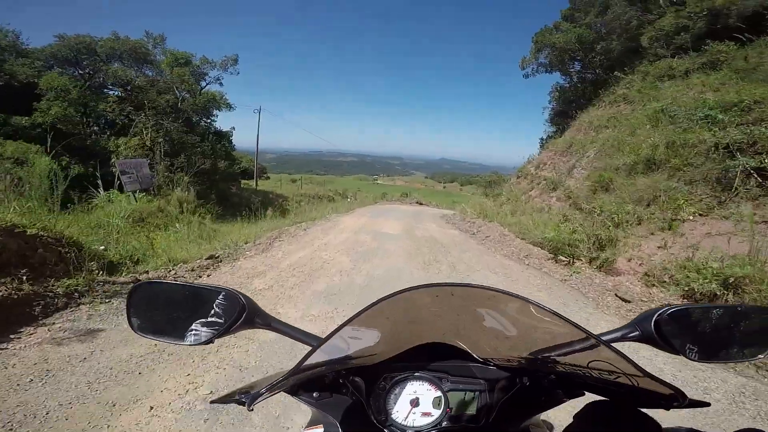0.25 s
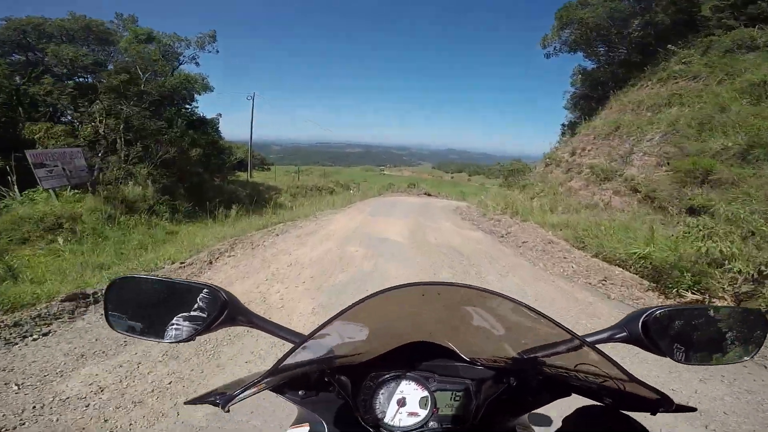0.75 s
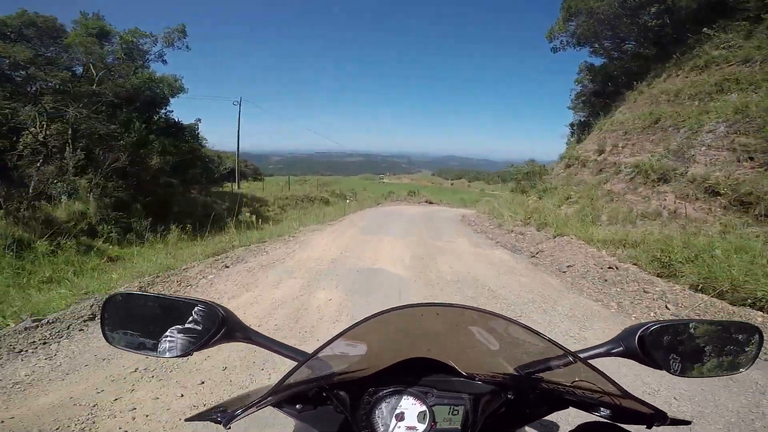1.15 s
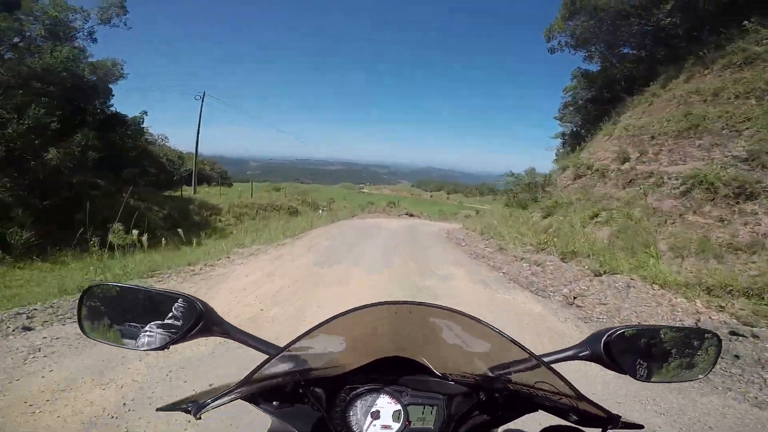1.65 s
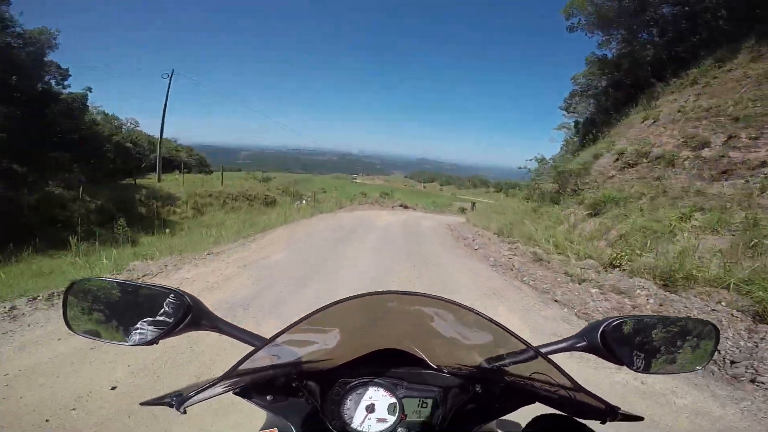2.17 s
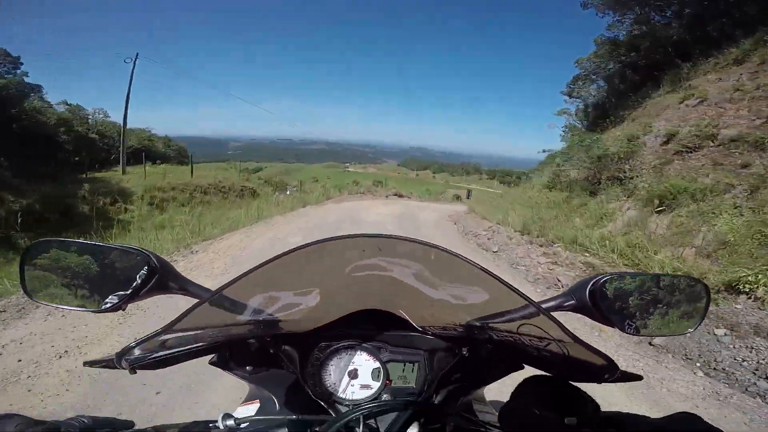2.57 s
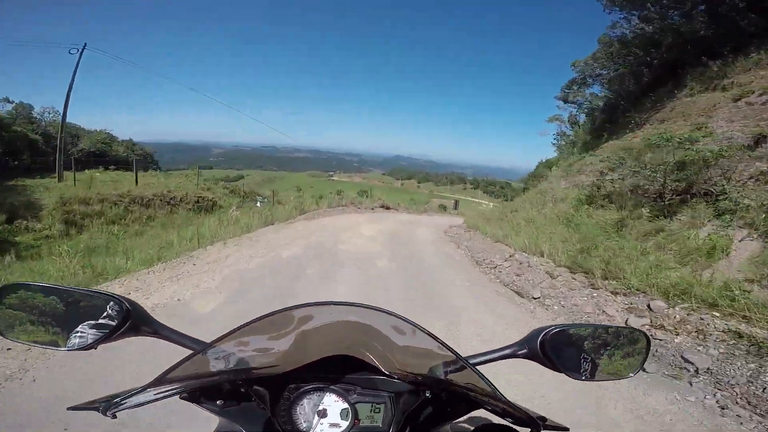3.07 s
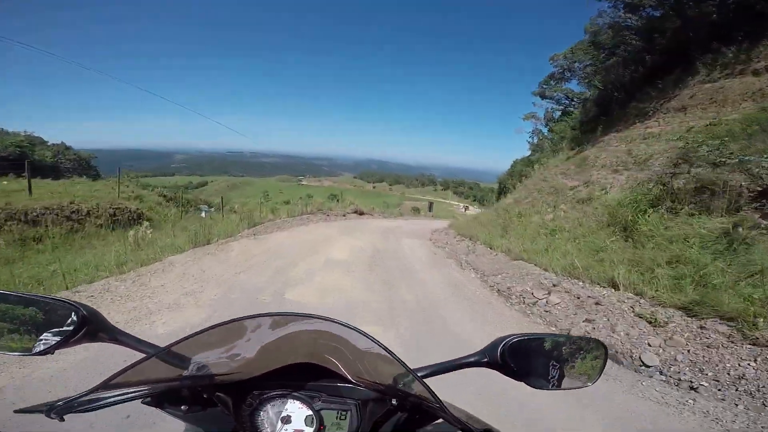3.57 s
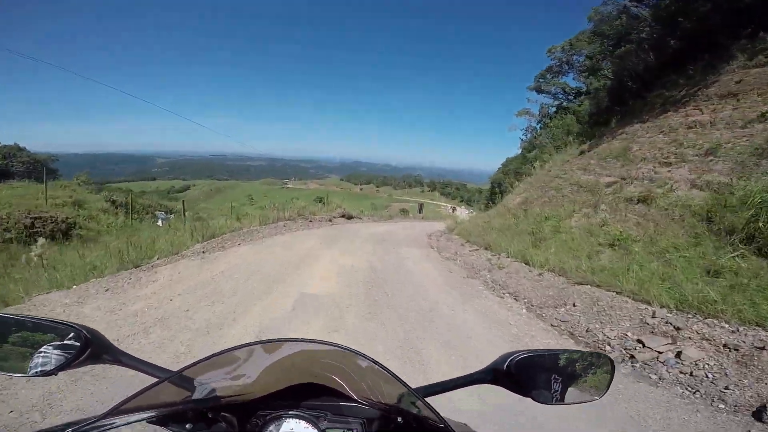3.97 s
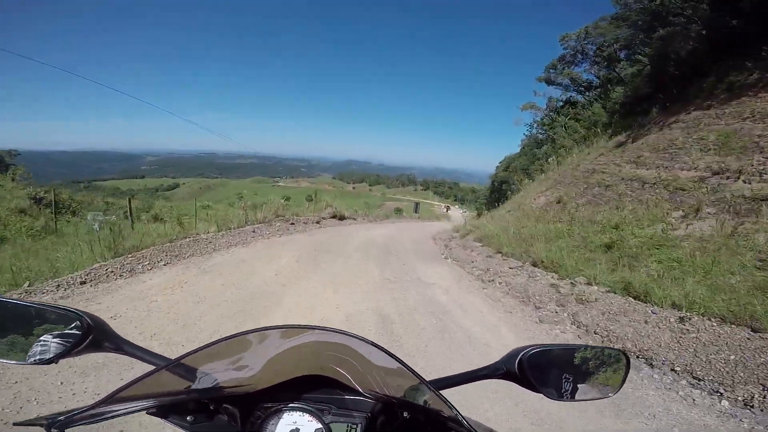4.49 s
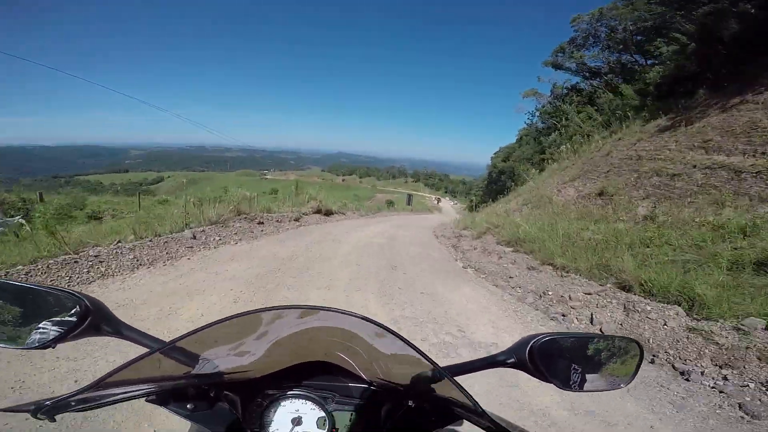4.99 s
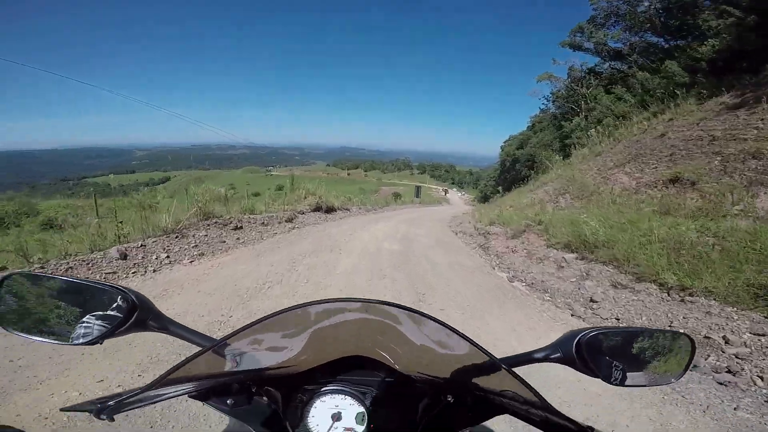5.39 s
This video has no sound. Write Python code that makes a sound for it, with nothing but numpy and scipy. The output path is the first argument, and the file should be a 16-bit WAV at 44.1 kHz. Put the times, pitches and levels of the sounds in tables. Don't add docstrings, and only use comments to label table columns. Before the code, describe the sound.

A four-cylinder motorcycle rolls slowly along an open gravel road, heard from an enclosed helmet camera just above it: close, dry, bass-heavy and muffled. The engine dominates throughout, a deep boom around 60 pulses per second, with double suction pulses, rough frame hum and irregular weak firings; it rises slightly near 3.9 s, then settles. Beneath lie tyre rumble, dull flickering gravel hiss, a faint chain whir, buzzing panels and windscreen, and a thin pump whine until about 3.6 s, returning at 5.45 s. Stones knock at 0.14 s; potholes thump at 0.2 s and 0.9-1.0 s, the boom briefly choking. A sharp tick comes at 0.48 s. Separate knocks follow at 0.94, 1.45 and 2.84 s, with thumps and knocks between 3.1 and 4.3 s. Stronger hits land at 4.47 s and, loudest, 4.98 s, before clustered rattling stones and grit scrapes around 5.4 s.

```python
import sys
import numpy as np
from scipy import signal
from scipy.fft import rfft, irfft
from scipy.io import wavfile
from scipy.ndimage import uniform_filter1d

SR = 44100
rng = np.random.default_rng(int(sys.argv[2]) if len(sys.argv) > 2 else 0)


def bounce(signal):
    frames = np.transpose(np.atleast_2d(signal))
    limited = np.clip(frames, -1, 1)
    pcm = np.round(limited * 32767).astype(np.int16)
    wavfile.write(sys.argv[1], SR, pcm)


def undo_db(level):
    steps = np.asarray(level, float) / 20
    return 10 ** steps


N = 248724
TIME, FREQ = np.arange(N) / SR, np.arange(N // 2 + 1) * SR / N + 1e-3

# (frequency [Hz], level [dB per Hz])
RUMBLE = [(12, -15.5), (30, -13), (60, 1.5), (100, -11), (250, -6), (450, -27.5), (700, -38), (1500, -97.5)]
# (frequency [Hz], level [dB per Hz])
HISS = [(280, -17.5), (450, -18), (620, -17), (760, -22.5), (1300, -25), (2200, -30),
        (3000, -28), (4200, -33.5), (5000, -47), (7000, -57), (10000, -63.5), (12500, -61), (14000, -54.5),
       (15000, -59.5)]
# (frequency [Hz], width [Hz], lift [dB])
COVERS = [(1330, 200, .5), (2250, 350, -1.5), (1900, 120, 2.5), (3300, 300, 1.5), (3750, 400, 2),
          (7500, 500, 3), (8570, 90, 4)]
# (time [s], length [s],
# level [dB], frequency [Hz], width [Hz])
SCRAPES = [(0.037, 0.079, -80, 14600, 5000), (0.146, 0.057, -41.5, 450, 700), (0.47, .04, -46.5, 705, 600),
           (4.5, 0.032, -46, 800, 1000), (0.474, 0.077, -47.5, 1210, 1600), (2.765, 0.075, -66, 4830, 4000),
           (2.915, 0.14, -81, 5204, 3020), (4.78, 0.027, -43, 1200, 1800), (4.845, 0.046, -46, 1088, 1830),
           (4.854, .07, -76, 7422, 900), (5.256, 0.01, -50, 3170, 249.4), (5.419, 0.042, -40.5, 1050, 1700),
           (5.475, .04, -50.5, 1190, 1800), (2.57, .09, -56, 2610, 200), (4.757, 0.054, -55, 2730, 220),
           (2.865, .04, -72, 5200, 3500), (3.04, .03, -69, 4900, 3000), (4.86, .07, -73, 5560, 3000),
           (5.12, .03, -79, 14200, 2500), (5.408, .04, -74.5, 5970, 4968),
           (5.415, 0.045, -70.5, 13250, 3980)]
# (time [s], frequency [Hz])
CHAIN = [(0, 2550), (2.0, 2560), (2.6, 2620), (3.5, 2700), (4.0, 2735), (5.0, 2725), (5.64, 2680)]
# (frequency [Hz], level [dB], width [Hz])
PANELS = [(1905, -67, 120), (3290, -69, 90), (3720, -68, 90), (14400, -95, 120)]
# (time [s], level [dB])
SCREEN = [(0, -55.5), (1.0, -61), (2.7, -63.5), (3.2, -59), (3.9, -57.5), (4.5, -74.5), (5.64, -75)]
# (start [s], stop [s])
PUMP_RUNS = [
    (0.051, 3.5),
    (5.45, 6.),
]
# (time [s], peak level [dB], pitch [Hz])
BUMPS = [(0.1743, -24, 75.6), (0.19, -28, 206), (0.668, -35, 42.7), (0.871, -22, 74), (0.871, -22.5, 216),
         (0.998, -24, 80.3), (2.653, -29, 78.5), (3.33, -25, 84), (3.699, -25, 228), (3.77, -25, 232),
         (3.874, -25, 78.6), (4.1, -23.5, 215), (4.29, -29, 81.6), (5.132, -30, 80.3)]
# (time [s], peak level [dB], pitch [Hz])
KNOCKS = [(0.1396, -32, 706), (.1585, -41, 635), (0.94, -38, 1006), (1.041, -47, 901.5),
          (1.449, -30.5, 894), (1.634, -41, 799.8), (2.84, -36, 897.8), (3.146, -38, 752),
          (3.234, -39, 1010), (3.349, -33, 750), (3.386, -41, 695), (3.917, -38, 700), (4.146, -52, 780),
          (4.4712, -25.5, 667), (4.476, -36, 760), (4.493, -36, 640), (4.499, -33, 848), (4.723, -37, 1220),
          (4.772, -39, 650), (4.78, -37, 900), (4.837, -34, 626), (4.868, -43, 840), (4.9836, -19.5, 846),
          (4.988, -26.5, 825), (5.027, -34, 780), (5.217, -37, 901.3), (5.271, -33.5, 880),
          (5.385, -38, 865), (5.398, -30, 794), (5.406, -29, 996), (5.41, -32, 898), (5.416, -31, 1080),
          (5.427, -35, 960), (5.432, -32, 1030), (5.448, -32, 700), (5.473, -33, 1210), (5.584, -39, 890)]
# (pitch ratio, level [dB], decay [cycles])
FAIRING = [(1, 0, 2.8), (1.2, -3, 3), (1.45, -10, 3.5), (2.1, -20, 5), (.72, -16, 2)]
# (time [s], peak level [dB], pitch [Hz])
TICKS = [
    (.4712, -50, 13800),
    (.4757, -43, 13300),
    (.4757, -42, 5300),
    (.4757, -52, 8000),
    (4.402, -55, 6000),
    (4.782, -62, 12300),
    (4.782, -54, 4700),
    (5.0874, -55, 5800),
]
# (time [s], firing rate [Hz])
ENGINE = [(0.0, 63.02), (0.44, 56.2), (0.72, 57.3), (0.83, 61.8), (0.89, 57.86), (1.68, 61.85),
          (1.95, 54.8), (2.06, 61.3), (2.72, 61.5), (3.06, 55.87), (3.12, 61.54), (3.85, 68.2),
          (3.97, 64.8), (4.96, 59.9), (4.99, 62.3), (5.42, 58.5), (5.5, 61.56), (5.64, 56.4)]
# (time [s], boom level [dB], shake level [dB])
LOAD = [(0, -1.5, 2.5), (.25, 0, -0.5), (.5, -0.5, -3.5), (.88, 0, -0.5), (1.1, -1.5, -1.5), (1.6, 0, 1),
        (1.9, -2, -4), (2.14, -0.5, -0.5), (2.5, -2, -1), (3.0, -2, -0.5), (3.36, 0, 3.5),
        (3.6, -2.5, -2.5), (3.82, -2.5, 2), (4.1, -0.5, 1), (4.25, -2, 3), (4.6, -2, 0.5), (5.1, -0.5, 1.5),
        (5.64, -1.5, -0.5)]
CYLINDERS_DB = [-3.2, .6, -.4, .5]
# (time [s], level [dB])
STUMBLES = [(0.041, -4), (0.306, -12), (0.517, -11), (0.66, -27), (0.801, -3), (1.007, -26), (1.279, -16.5),
            (1.413, -17.5), (1.544, -13), (1.809, -3), (2.086, -5.5), (2.152, -26), (2.217, -8.5),
            (2.414, -3), (2.612, -15.5), (2.879, -3), (3.017, -3), (3.217, -15.5), (3.533, -2),
            (3.655, -10.5), (3.836, -8.5), (4.021, -3), (4.209, -3), (4.4, -3), (4.59, -11.5), (4.721, -3),
            (4.919, -13.5), (5.182, -7.5), (5.316, -3), (5.519, -7)]
# (time [s], level [dB])
DIPS = [
    (.2, -14),
    (.898, -18),
    (3.05, -7),
    (3.865, -6),
    (4.23, -4),
    (5.14, -6),
]
# (frequency [Hz], width [Hz], lift [dB])
PIPE = [(122, 45, -5.5), (385, 54, 8.5), (453, 47, -7.5), (577, 120, 7), (260, 22, 3)]
# (frequency [Hz], width [Hz], level [dB], push by opposite cylinders, push by alternate ones)
FRAME = [(74, 19, 0.5, 0.79, 0.11), (200, 28, -2, 0.39, -1.2), (160, 48, -10.5, 0.58, -0.38),
         (16, 17, -11, .1, 0.19), (249, 50, -6.5, .1, 1.1)]

CHAIN_DB, CHAIN_PULL_DB, CHAIN_WIDTH_HZ = -66, 3.5, 170
SCREEN_HZ, SCREEN_WIDTH_HZ = 1300, 320
PUMP_HZ, PUMP_DB, PUMP_SAG_DB_PER_S, PUMP_RAMP_S = 1960, -57.5, -1.25, 0.18
ROUGH_HZ, ROUGH_SPAN_HZ = 63.0, 1.3
IDLE_HUNT_HZ, ROUGH_HUNT_HZ = 0.3, 0.8
STUMBLE_SAG_HZ, STUMBLE_S = 0.52, 0.056
BOOM_DB, SILENCER_HZ, SILENCER_WIDTH_HZ = -23.5, 66.76, 10.7
IDLE_BOOM_DB, ROUGH_BOOM_DB, DIP_S = 0.6, 0.5, 0.011
GAP_DB, GAP_LATE_S, GAP_S = -9.5, 0.036, 0.0074
PULSE_DB, PULSE_DB_PER_HZ, PULSE_ROUGH_DB = -36, -0.12, -4
ROUGH_SCATTER_DB = 0.5
SHAKE_DB, SHAKE_RISE_DB = -37.5, 6
JOLT_DB, JOLT_S = 2.5, 0.045
CHANCE_PUSH, ROUGH_PUSH = 0.3, 0.65
HUSH_DB, HUSH_LATE_S, HUSH_S = -9.5, 0.0055, 0.011


def level(x, db):
    return x * undo_db(db) / np.sqrt(np.mean(x ** 2))


def curves(table):
    s, *columns = np.transpose(table)
    return [np.interp(TIME, s, c) for c in columns]


def near(s, span_s):
    return np.exp(-((TIME - s) / span_s) ** 2)


def walk(rate):
    k = int(SR / rate)
    held = np.repeat(rng.standard_normal(N // k + 1), k)
    return 1.76 * uniform_filter1d(uniform_filter1d(held, k), k)[:N]


def colour(x, points, gain=1):
    hz, db = np.transpose(points)
    return irfft(rfft(x) * undo_db(np.interp(np.log(FREQ), np.log(hz), db)) * gain, N)


def lift(modes):
    return undo_db(sum(db / (1 + (2 * (FREQ - f) / w) ** 2) for f, w, db in modes))


def ring(x, hz, width_hz):
    return signal.lfilter(*signal.iirpeak(hz, hz / width_hz, fs=SR), x)


def blurred(turns, db, width_hz):
    angle = 2 * np.pi * turns
    return undo_db(db) * (walk(width_hz) * np.sin(angle) + walk(width_hz) * np.cos(angle))


def hits(table, cycles, partner):
    out, t = np.zeros(N), TIME[:SR // 3]
    for s, db, hz in table:
        shape = (1 - np.exp(-t * hz / 0.58)) * np.exp(-t * hz / cycles)
        tone = np.sin(2 * np.pi * hz * t) + 0.15 * np.sin(2 * np.pi * partner * hz * t)
        start = int(s * SR)
        out[start:start + len(t)] += (undo_db(db) * shape * tone)[:N - start]
    return out


def rumble():
    return undo_db(2.5 * walk(6)) * level(colour(rng.standard_normal(N), RUMBLE), -42)


def hiss(turns):
    grit = undo_db(1.4 * rng.exponential(size=N // 64 + 1)).repeat(64)[:N]
    grit = level(grit, 0)
    out, shared = 0, walk(7.2)
    for hz in 300 * 2 ** np.arange(0, 6, .5):
        band = np.clip(np.cos(np.pi * np.clip(np.log2(FREQ / hz), -.5, .5)), 0, 1)
        low = hz < 2000
        grains = rng.standard_normal(N) * (grit if low else 1)
        db = 0.33 * shared + 0.46 * walk(14)
        db = db + (0 if low else .9) * walk(6)
        db = db * (1 if hz < 5000 else .4)
        out = out + undo_db(db) * colour(grains, HISS, band * lift(COVERS))
    return level(out * undo_db(.6 * np.cos(2 * np.pi * 2 * turns)), -44.0)


def scrapes():
    out = np.zeros(N)
    for s, length, db, hz, width_hz in SCRAPES:
        grains = rng.standard_normal(N) * undo_db(2.2 * walk(250))
        for _ in range(3):
            grains = ring(grains, hz, width_hz)
        out += level(grains, db) * np.exp(-((TIME - s) / length) ** 2 * 2)
    return out


def panels():
    out = 0
    for hz, db, width_hz in PANELS:
        turns = np.cumsum(hz * (1 + .006 * walk(2))) / SR
        out = out + blurred(turns, db + 1.8 * walk(4), width_hz)
    return out


def windscreen():
    return blurred(SCREEN_HZ * TIME, curves(SCREEN)[0] + 2.2 * walk(5), SCREEN_WIDTH_HZ)


def chain():
    db = CHAIN_DB + CHAIN_PULL_DB * roughness(curves(ENGINE)[0]) + 2 * walk(6)
    return blurred(np.cumsum(curves(CHAIN)[0]) / SR, db, CHAIN_WIDTH_HZ)


def pump():
    runs = []
    for on, off in PUMP_RUNS:
        to_edge_s = np.minimum(TIME - on, off + PUMP_RAMP_S - TIME)
        ramp = np.clip(to_edge_s / PUMP_RAMP_S, 0, 1)
        runs.append(PUMP_SAG_DB_PER_S * (TIME - on) - 20 * (1 - ramp))
    db = PUMP_DB + np.minimum(np.max(runs, axis=0), 0) + 0.5 * walk(8.2)
    return np.sqrt(2) * undo_db(db) * np.sin(2 * np.pi * PUMP_HZ * TIME)


def potholes():
    return hits(BUMPS, cycles=4.0, partner=0.6)


def stones():
    out = 0
    for ratio, mode_db, cycles in FAIRING:
        mode = [(s, db + mode_db, hz * ratio) for s, db, hz in KNOCKS]
        out = out + hits(mode, cycles=cycles, partner=1.5)
    return out


def mount():
    return hits(TICKS, cycles=4.5, partner=.9)


def roughness(hz):
    return (1 + np.tanh((uniform_filter1d(hz, size=9000) - ROUGH_HZ) / ROUGH_SPAN_HZ)) / 2


def firing_rate():
    hz = curves(ENGINE)[0]
    sag = 0
    for s, db in STUMBLES:
        t = np.maximum(TIME - s, 0) / STUMBLE_S
        sag = sag + np.tanh(-db / 9) * t * np.exp(1 - t)
    hunt_hz = IDLE_HUNT_HZ + ROUGH_HUNT_HZ * roughness(hz)
    hz = hz - STUMBLE_SAG_HZ * sag + hunt_hz * walk(9)
    when = np.transpose(STUMBLES)[0]
    rounds = np.diff(np.interp(when, TIME, np.cumsum(hz) / SR))
    catch_up = np.r_[0, (4 * np.round(rounds / 4) - rounds) / np.diff(when), 0]
    return hz + uniform_filter1d(catch_up[np.searchsorted(when, TIME)], size=1500)


def weakness(late_s, span_s, spare_db=0):
    return sum(np.tanh(-(db + spare_db) / 9) * near(s + late_s, span_s) for s, db in STUMBLES)


def silencer(hz, turns, swell, load_db):
    detune = 2 * (hz - SILENCER_HZ) / SILENCER_WIDTH_HZ
    db = BOOM_DB + load_db - 10 * np.log10(1 + detune ** 2)
    db = db + sum(dip_db * near(s, DIP_S) for s, dip_db in DIPS)
    db = db + (IDLE_BOOM_DB + ROUGH_BOOM_DB * roughness(hz)) * walk(11)
    db = db + GAP_DB * weakness(GAP_LATE_S, GAP_S)
    return undo_db(db) * np.sqrt(2) * swell * np.cos(2 * np.pi * (turns - .28))


def frame(cylinder, stray, firing, shuts):
    shake = 0
    for hz, width_hz, db, opposite, alternate in FRAME:
        push = opposite * np.cos(np.pi / 2 * cylinder) + alternate * (-1.) ** cylinder + stray
        shake = shake + undo_db(db) * level(ring(push[firing] * shuts ** 2, hz, width_hz), 0)
    return shake * undo_db(HUSH_DB * weakness(HUSH_LATE_S, HUSH_S, spare_db=2))


def engine():
    hz = firing_rate()
    rough = roughness(hz)
    turns = np.cumsum(hz) / SR + 1.1
    boom_load_db, shake_load_db = curves(LOAD)
    pulse_db = PULSE_DB + PULSE_DB_PER_HZ * (hz - ROUGH_HZ) + PULSE_ROUGH_DB * rough
    jolts = sum(near(s, JOLT_S) for s, _, _ in BUMPS)
    shake_db = SHAKE_DB + shake_load_db + SHAKE_RISE_DB * rough + JOLT_DB * jolts * (1 - rough)

    chance = rng.standard_normal((500, 4))
    count = np.arange(len(chance))
    rough_firing = np.interp(count, turns, rough)
    when, depth_db = np.transpose(STUMBLES)
    missed = np.round(np.interp(when, TIME, turns) + .2).astype(int)
    cylinder = (count - missed[0]) % 4
    size = undo_db(np.take(CYLINDERS_DB, cylinder) + .7 * chance[:, 0])
    size = size * undo_db(ROUGH_SCATTER_DB * np.tanh(chance[:, 1]) * rough_firing)
    size[missed] = undo_db(depth_db)
    load = np.clip(undo_db(shake_db + 36 + 6 * rough), .45, 3.2)

    def pulse(angle, width_s, slack_s, column):
        firing = np.floor(turns - angle + .5).astype(int)
        offset_s = (turns - angle - firing) / hz - slack_s * load * chance[firing, column]
        return 1 / (1 + (offset_s / width_s) ** 2), firing

    opens, early = pulse(-.4, .0011, .00021, column=2)
    shuts, firing = pulse(0, .00085, .00011, column=1)
    pulses = -size[firing] * shuts - .85 * size[early] * undo_db(1.3 * chance[early, 3]) * opens
    inlet = [(20, -43.5), (50, 0.5), (100, 4.5), (900, -1.0), (2500, -43.5)]
    pulses = undo_db(pulse_db) * level(colour(pulses, inlet, lift(PIPE)), 5.14)

    swell = uniform_filter1d(size[firing] ** .15, size=700)
    boom = silencer(hz, turns, swell, boom_load_db)
    stray = (CHANCE_PUSH + ROUGH_PUSH * rough_firing) * np.tanh(chance[:, 3])
    shake = undo_db(shake_db - 2.5) * frame(cylinder, stray, firing, shuts)
    return boom + pulses + shake, turns


def scene():
    motor, turns = engine()
    road = rumble() + hiss(turns) + scrapes()
    bodywork = panels() + windscreen() + potholes() + stones() + mount()
    return (road + bodywork + chain() + pump() + motor)[None]


def roll_off(x):
    return signal.sosfilt(signal.butter(12, 15290, fs=SR, output="sos"), x)


def record(dry):
    mix = np.tanh(3.0 * dry) / 2.185
    return roll_off(mix)


dry = scene()
out = record(dry)
bounce(out)
```